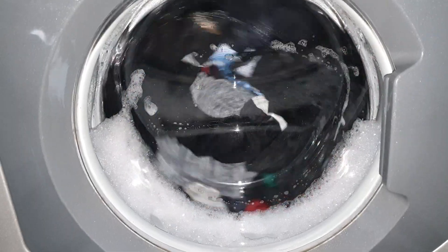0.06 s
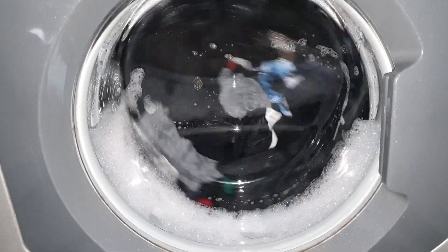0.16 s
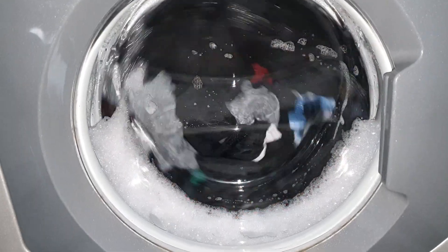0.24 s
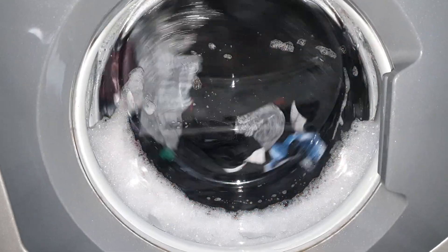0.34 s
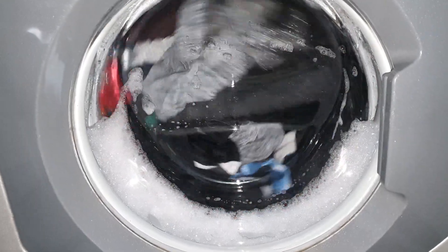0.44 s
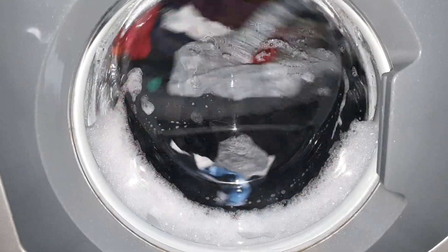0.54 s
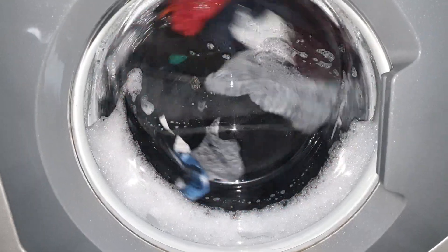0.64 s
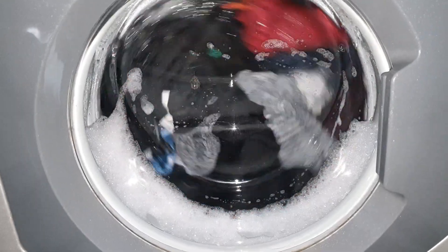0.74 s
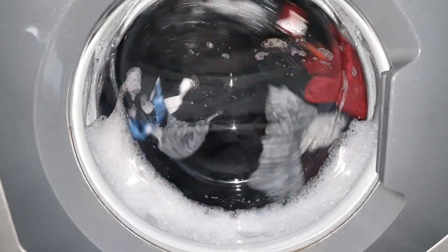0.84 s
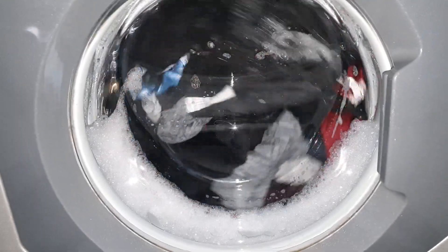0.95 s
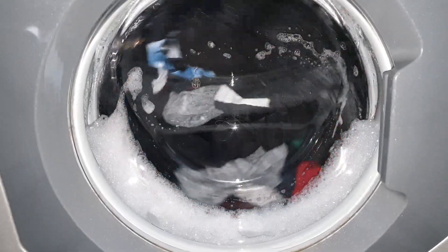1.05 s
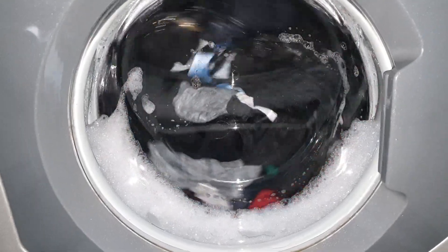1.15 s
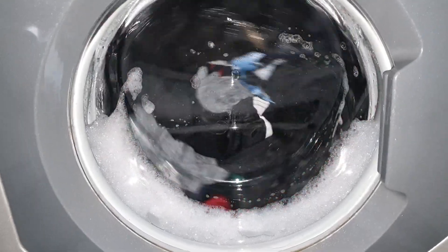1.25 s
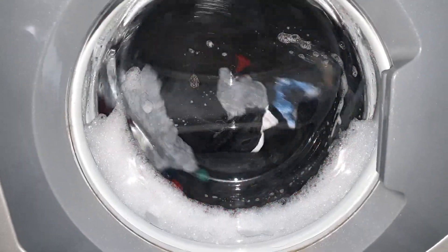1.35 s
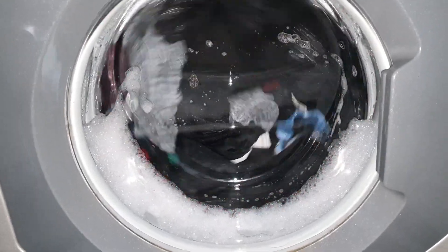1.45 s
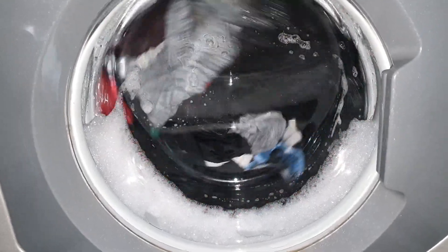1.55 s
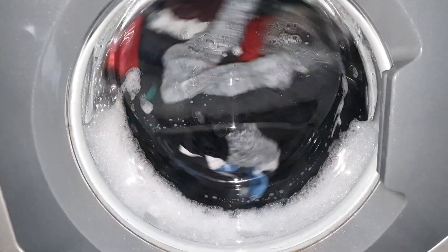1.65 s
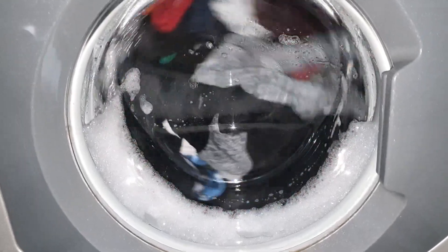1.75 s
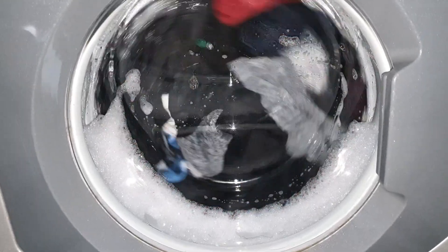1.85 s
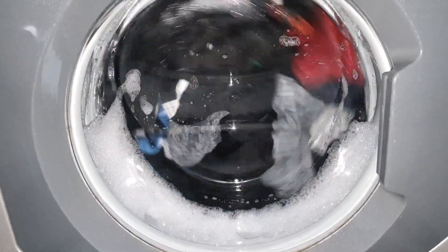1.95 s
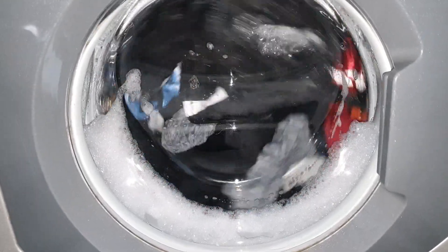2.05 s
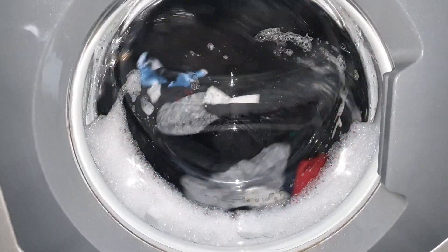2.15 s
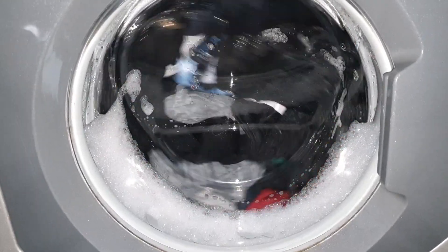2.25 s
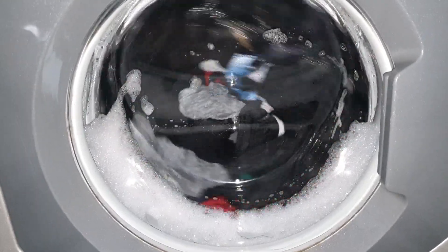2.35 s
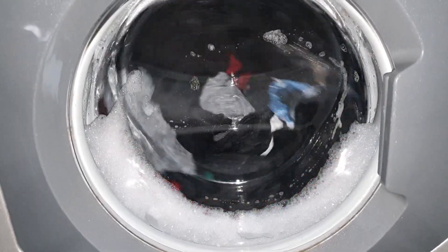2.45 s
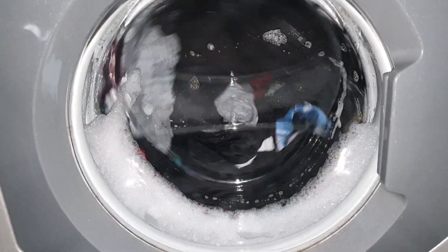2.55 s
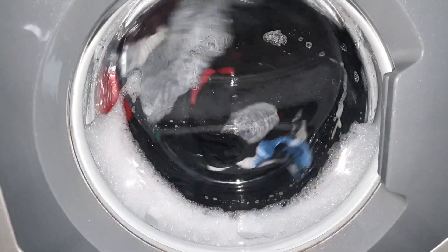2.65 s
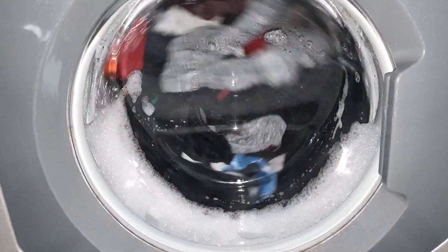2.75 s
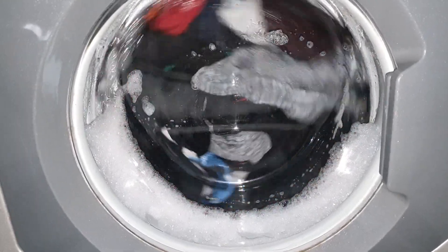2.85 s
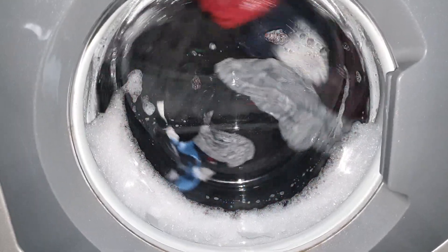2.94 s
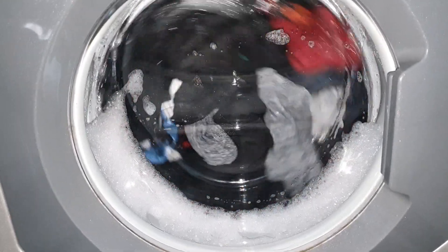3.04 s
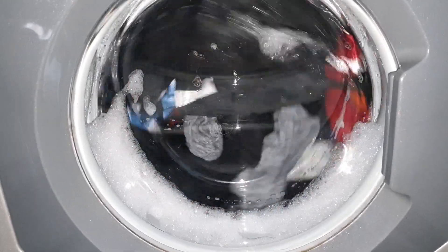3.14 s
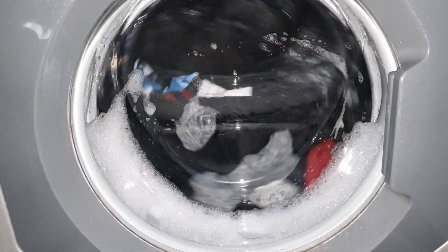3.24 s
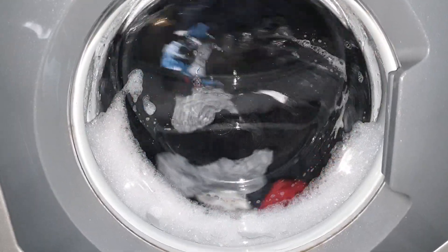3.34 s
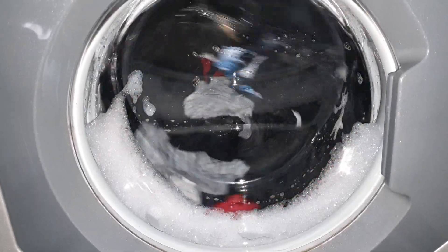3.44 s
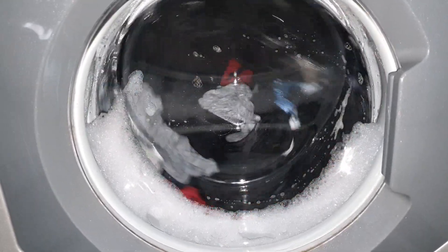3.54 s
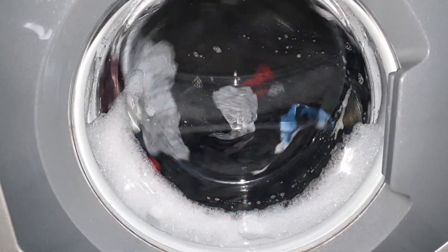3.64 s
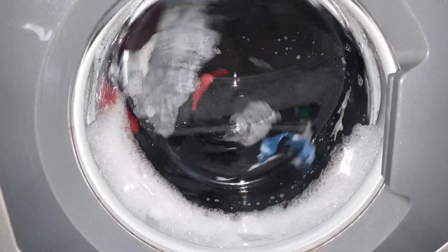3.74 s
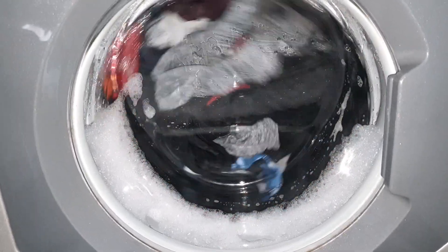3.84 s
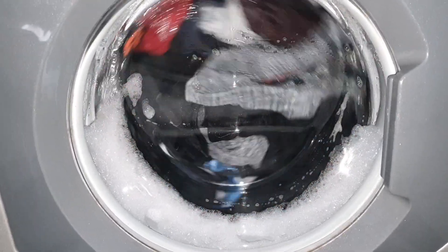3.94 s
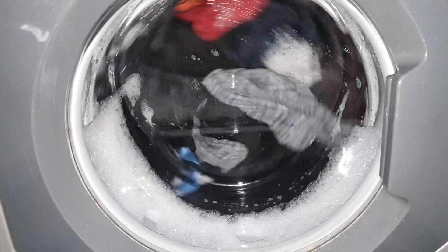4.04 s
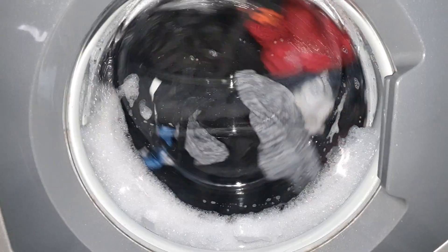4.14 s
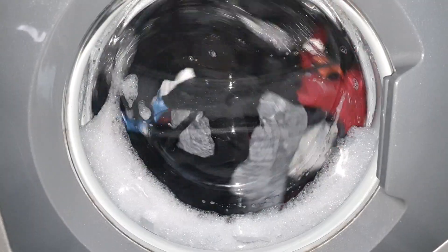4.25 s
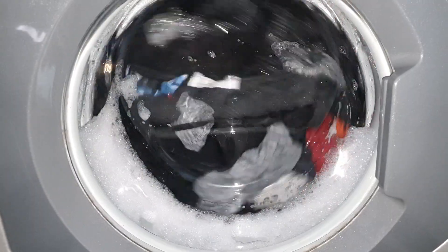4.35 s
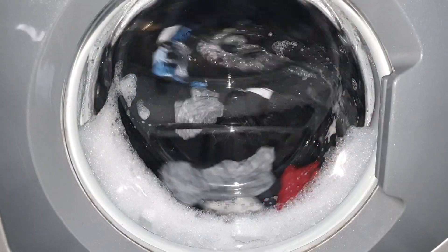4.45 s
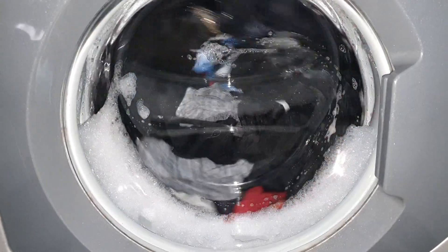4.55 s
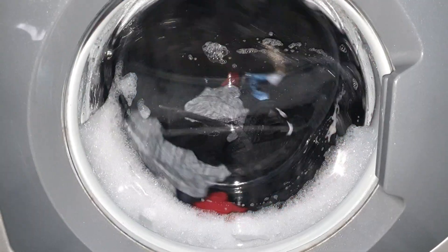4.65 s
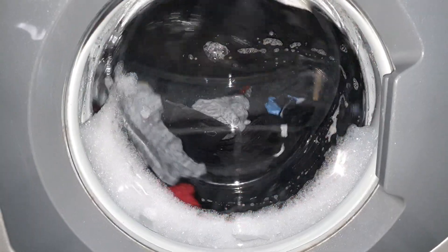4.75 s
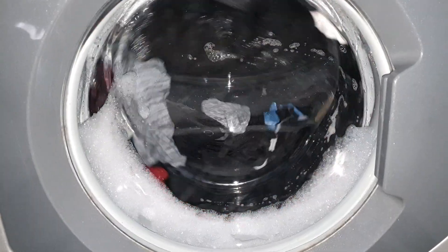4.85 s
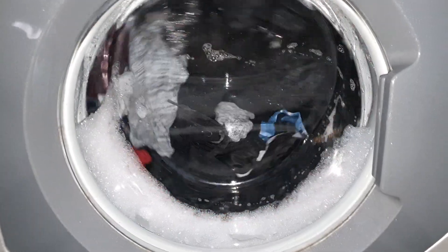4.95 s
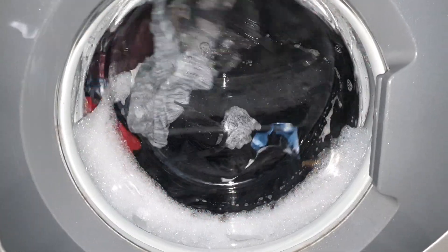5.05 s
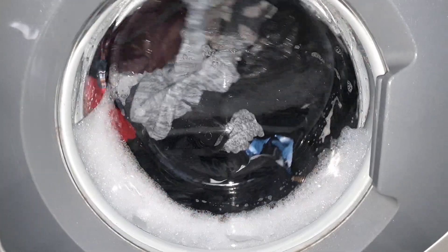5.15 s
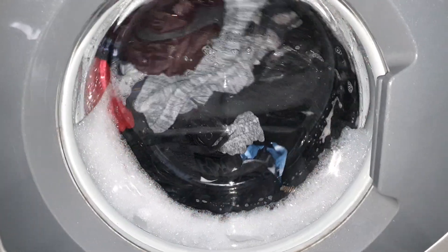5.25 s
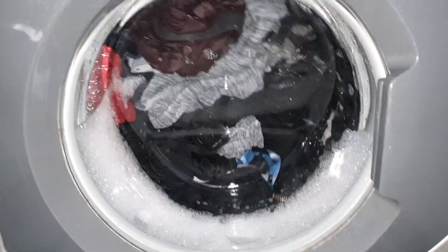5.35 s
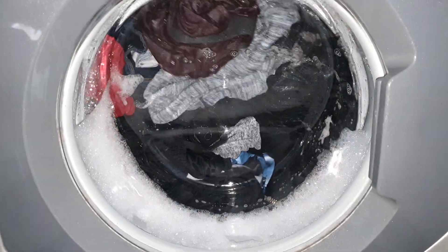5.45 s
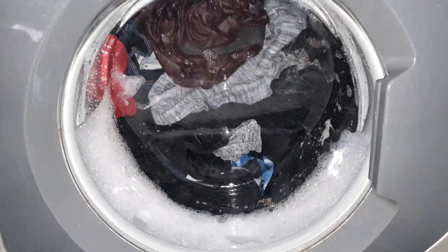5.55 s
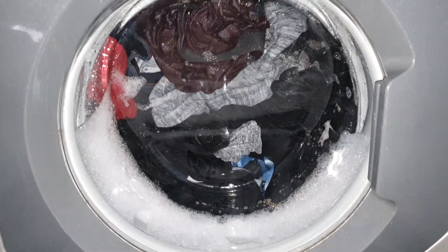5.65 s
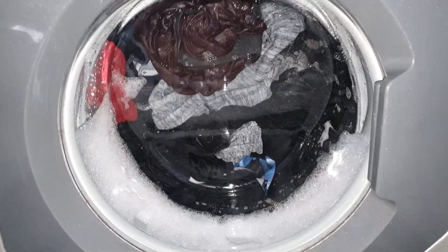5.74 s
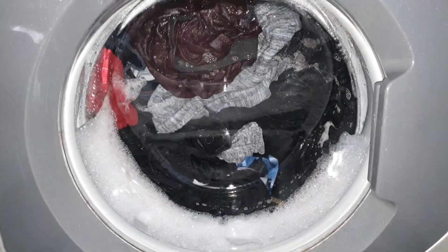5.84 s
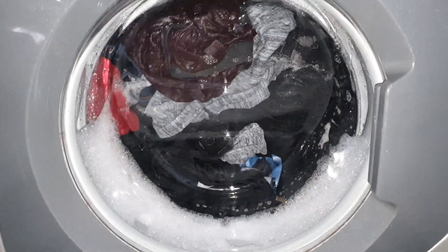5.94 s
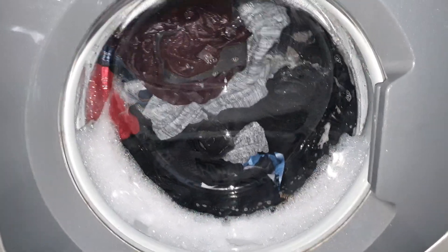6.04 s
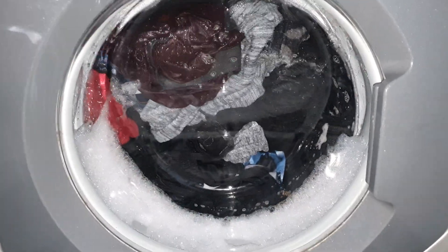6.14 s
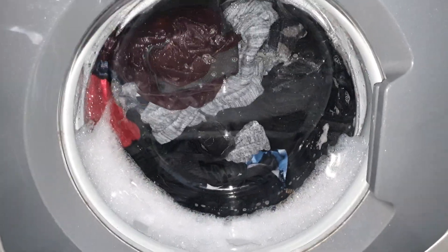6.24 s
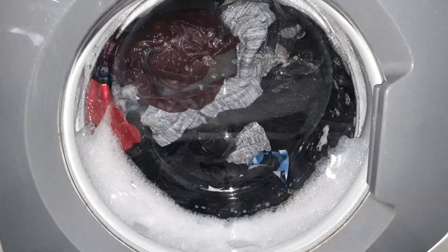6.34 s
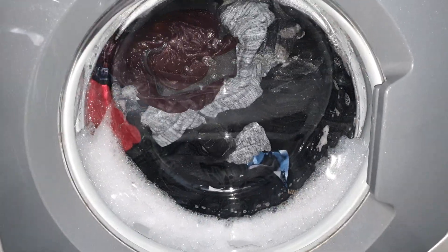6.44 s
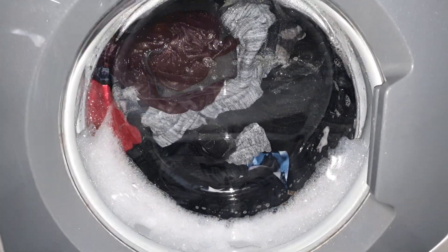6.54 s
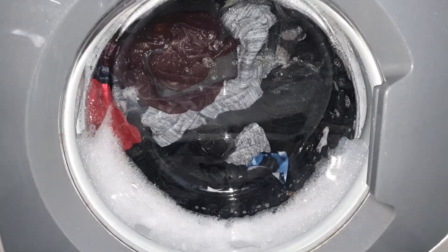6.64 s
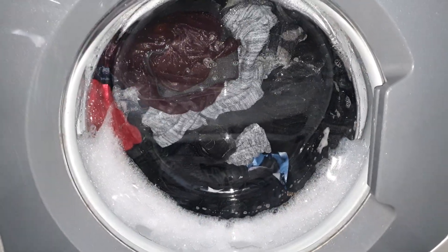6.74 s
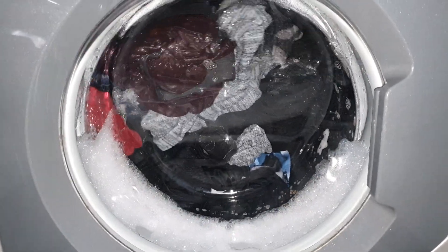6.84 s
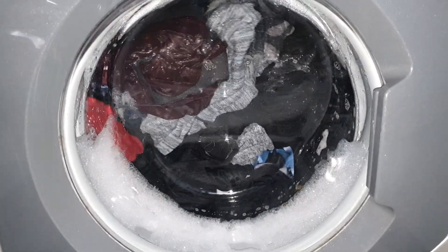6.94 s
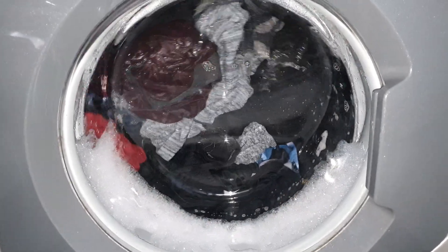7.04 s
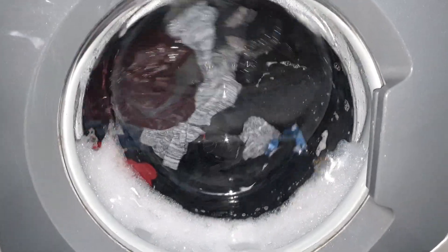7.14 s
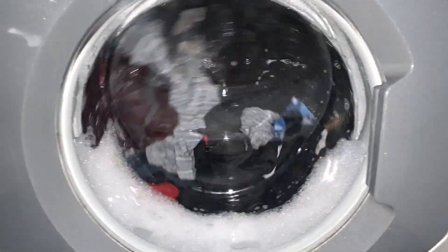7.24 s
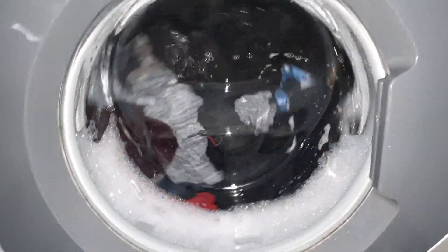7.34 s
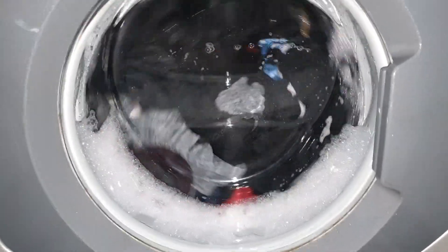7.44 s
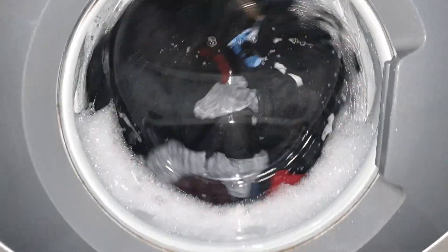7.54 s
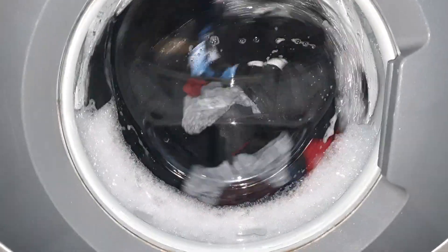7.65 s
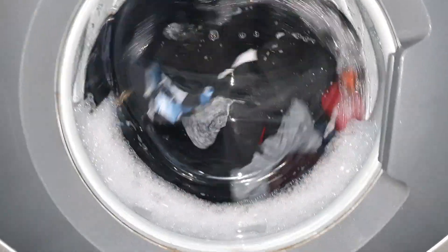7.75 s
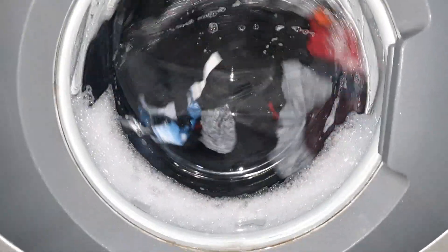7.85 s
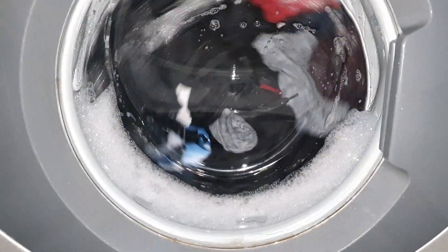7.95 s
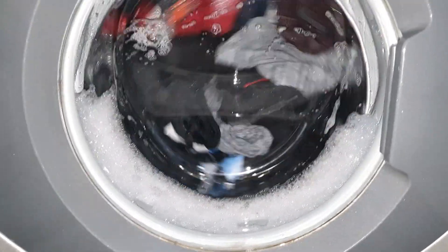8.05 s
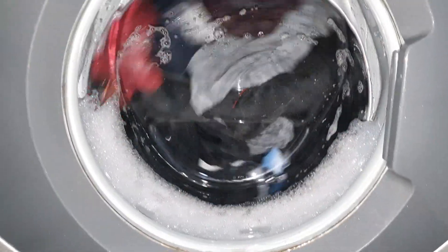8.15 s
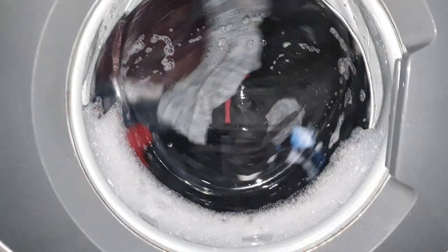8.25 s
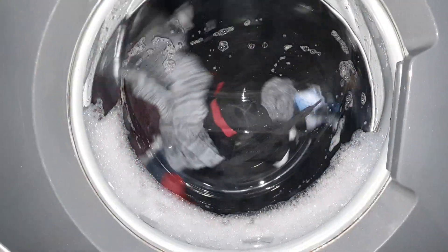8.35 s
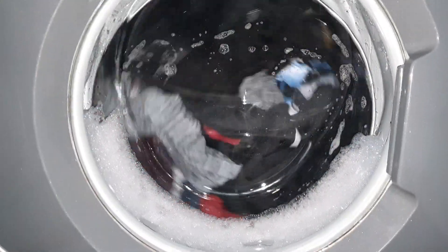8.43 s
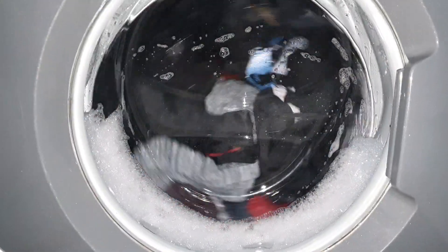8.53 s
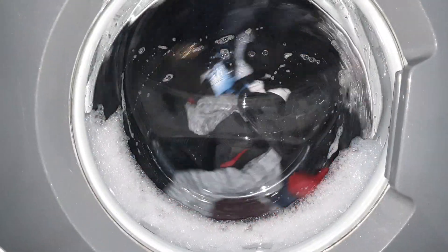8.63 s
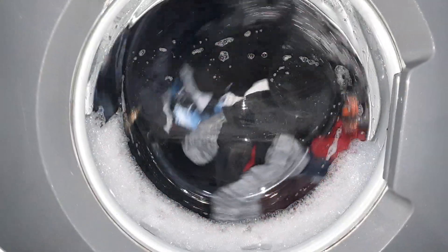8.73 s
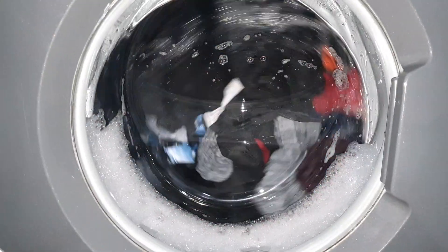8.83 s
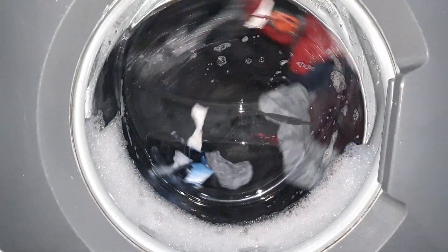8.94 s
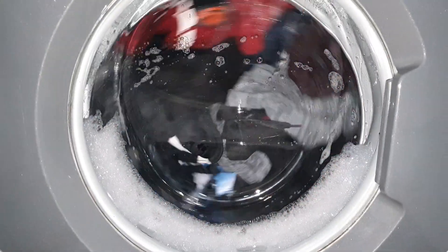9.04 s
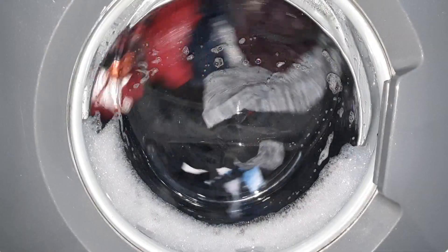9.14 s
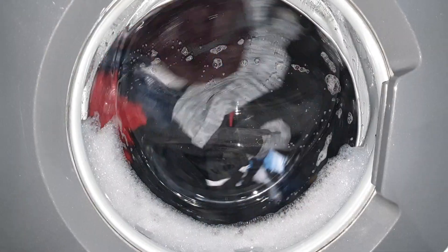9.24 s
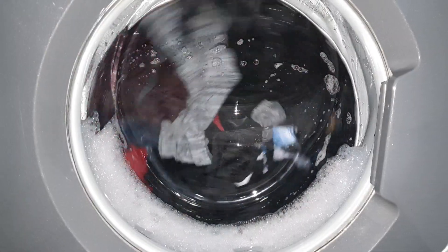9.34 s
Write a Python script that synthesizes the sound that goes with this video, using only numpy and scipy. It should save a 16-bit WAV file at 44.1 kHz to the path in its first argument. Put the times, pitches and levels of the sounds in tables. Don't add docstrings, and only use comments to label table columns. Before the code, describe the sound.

Close at a front-loading washer, wet clothes slap and thud in suds over a motor hum, pause to quiet hum, then tumble again in reverse.

```python
import sys
import numpy as np
from scipy import signal
from scipy.fft import rfft, irfft, next_fast_len
from scipy.io import wavfile
from scipy.ndimage import uniform_filter1d, minimum_filter1d

SR = 44100
rng = np.random.default_rng(int(sys.argv[2]) if len(sys.argv) > 2 else 0)


def to_wav(s):
    ch = np.atleast_2d(s).T
    pcm = np.round(np.clip(ch, -1, 1) * 32767)
    wavfile.write(sys.argv[1], SR, pcm.astype(np.int16))


def invert_db(x):
    u = np.asarray(x, float) / 20
    return 10 ** u


N = 414099

# start_s [s], peak_db [dB], bass_db [dB]
SLAPS = [(0.1239, -41.5, -12), (0.4493, -40.5, -10.5), (0.7696, -46.5, -7), (0.781, -50, -6),
         (1.262, -42.5, -9.5), (1.66, -48.5, -9), (1.8616, -50, -15), (2.151, -39.5, -11),
         (2.481, -39.5, -6.5), (2.9302, -39, -32), (3.287, -38.5, -11), (3.345, -47.5, -21),
         (3.69, -46.5, -13), (4.09, -39, -29), (4.433, -46, -19), (7.581, -37, -13), (7.7743, -40.5, -7),
         (7.957, -40, -6), (8.054, -46.5, -5), (8.288, -51.5, -17), (8.3794, -56, -15), (8.628, -43.5, -4),
         (9.1134, -50, -7)]
# start_s [s], peak_db [dB], treble_db [dB], bass_db [dB]
SPLASHES = [(.301, -63, -6, -12), (7.93, -59.5, -5, -8), (8.603, -53.5, -13, -5), (1.132, -57, -18, 0.5),
            (1.8086, -64, -5, 10.5), (1.9325, -54.5, -15, -1.5), (1.988, -54.5, -15, -2.5),
            (2.2573, -76, -15, 13), (2.9118, -52.5, -21, -1), (4.075, -49, -15, -4), (3.053, -52, -23, 2),
            (3.1032, -55, -8, 2), (3.511, -61, -7, -11), (3.9114, -58, -9, -3), (4.253, -50.5, -16.5, 1.5),
            (4.401, -49.5, -15.5, 0.5), (4.478, -57.5, -8, -18), (4.508, -56.5, -12, -14),
            (4.535, -64, -9, -9), (4.8085, -51.5, -16.5, -13), (4.8693, -57, -15.5, -6),
            (5.0843, -64.5, -8.5, 5.5), (7.274, -52.5, -16, -4), (7.4, -55.5, -17, -22),
            (7.335, -48.5, -15, -5), (8.188, -50.5, -27, -1), (8.905, -70, -30, 5), (8.999, -55.5, -31, 1),
            (9.2582, -57, -24, 6)]
SLAP_TREBLE_DB = -20.5
START_S = 6.7


def curves(table):
    s, *columns = np.transpose(table)
    return [np.interp(np.arange(N) / SR, s, c) for c in columns]


def ramp(start_s, length_s):
    return np.clip((np.arange(N) / SR - start_s) / length_s, 0, 1)


def between(ends, share):
    return ends[0] + (ends[1] - ends[0]) * share


def unit(x):
    return x / np.sqrt(np.mean(x ** 2))


def colour(x, points):
    hz, db = np.transpose(points)
    size = next_fast_len(N)
    bins_hz = np.fft.rfftfreq(size, 1 / SR) + 1
    gain = invert_db(np.interp(np.log(bins_hz), np.log(hz), db))
    return irfft(rfft(x, size) * gain, size)[..., :N]


def band(x, lo_hz, hi_hz, order=2):
    sos = signal.butter(order, [lo_hz, min(hi_hz, SR / 2.1)], "band", fs=SR, output="sos")
    return signal.sosfilt(sos, x)


def ring(x, hz, t60_s):
    pole = np.exp(2j * np.pi * hz / SR - np.log(1000) / (t60_s * SR))
    return signal.lfilter([0, pole.imag], [1, -2 * pole.real, abs(pole) ** 2], x)


def walk(rate_hz):
    step = 32
    k = int(SR / rate_hz / step)
    held = np.repeat(rng.standard_normal(N // step // k + 2), k)
    slow = uniform_filter1d(uniform_filter1d(held, k), k)
    return 1.88 * np.interp(np.arange(N) / step, np.arange(len(slow)), slow)


def pair(alike):
    mid, side = rng.standard_normal((2, N))
    return np.sqrt((1 + alike) / 2) * mid + np.sqrt((1 - alike) / 2) * side * np.array([[1], [-1]])


def add(out, start_s, sound):
    i = int(start_s * SR)
    out[..., i:i + sound.shape[-1]] += sound[..., :N - i]


def sides(pan_db):
    return invert_db(np.array([[pan_db / 2], [-pan_db / 2]]))


def water(churn_db, slosh_db):
    # freq_hz [Hz], level_db [dB per Hz]
    splash_shape = [(410, -16), (700, 0.5), (898, 3), (1200, -3), (1580, -9.5), (1890, -5.5), (2080, -5),
                    (2990, -4), (4610, -17), (6830, -18.5), (7690, -38), (9350, -20.5), (13900, -50),
                    (15200, -27), (16000, -47)]
    # freq_hz [Hz], level_db [dB per Hz]
    churn_shape = [(76, -36), (130, -15.5), (146, 6), (205, -8), (292, -0.5), (425, -12), (668, -11),
                   (767, -15), (1070, -12), (1500, -23), (2510, -23.5), (3500, -27.5), (5520, -27),
                   (7560, -35.5), (14500, -46.5)]
    # freq_hz [Hz], left_minus_right_db [dB]
    balance = [(60, 2), (110, -1), (200, 0.5), (380, 2.5), (700, 1.5), (1290, 17), (2380, 21), (4400, 20),
               (8120, 6), (15000, 3.5)]
    pan_at_slap_db, pan_per_treble_db = 9, -2
    onset_s_per_db, hardest_db = .0004, -36
    spray_rise_s, slap_patch_db, suds_patch_db = .005, .6, .8

    flop, body, spray = np.zeros((3, 2, N))
    t = np.arange(SR // 2) / SR
    for s, db, treble_db, bass_db in [(s, db, SLAP_TREBLE_DB, bass) for s, db, bass in SLAPS] + SPLASHES:
        pan_db = pan_at_slap_db + pan_per_treble_db * (treble_db - SLAP_TREBLE_DB)
        fall = 1.25 * invert_db(-60 * t / 0.43) + 0.5 * np.exp(-(t / 0.038) ** 2) + 0.48 * np.exp(-t / 0.0075)
        fall = fall * np.clip(t / (onset_s_per_db * max(hardest_db - db, 1)), 0, 1)
        mist = fall ** 1.6 * (1 - np.exp(-t / spray_rise_s))
        add(flop, s, invert_db(db + bass_db - 1.5) * fall)
        add(body, s, invert_db(db - 5.5) * sides(0.34 * pan_db - 14.5) * fall)
        add(spray, s, invert_db(db + treble_db + 19.5) * sides(0.13 * pan_db - 7.5) * mist)

    grains = invert_db(1.7 * uniform_filter1d(rng.exponential(size=N), size=14))
    slap = unit(colour(pair(0.21) * grains, splash_shape))
    churn = unit(band(colour(pair(0.8) * np.sqrt(grains), churn_shape), 73, 20000))
    slosh = unit(colour(band(pair(1.0), 137, 603), churn_shape))
    out = invert_db(slosh_db + 1.17 * walk(9)) * slosh
    edges_hz = 620 * 2 ** np.arange(0, 5.1, .5)
    for lo, hi in zip(edges_hz, edges_hz[1:]):
        envelope = flop if hi < 1500 else body if hi < 7100 else spray
        keep = np.exp(-lo ** 2 / (4000 * SR))
        burst = signal.lfilter([1 - keep], [1, -keep], envelope)
        out = out + band(slap, lo, hi) * burst * invert_db(slap_patch_db * walk(70))
        out = out + band(churn, lo, hi) * invert_db(churn_db + 11.5 + suds_patch_db * walk(17))
    return np.array([colour(ear, [(hz, sign * db / 2) for hz, db in balance])
                     for ear, sign in zip(out, (1, -1))])


def droplets():
    # freq_hz [Hz], level_db [dB], t60_s [s]
    clack_modes = [(3050, -2, 0.022), (2240, -10, 0.021), (2570, -9, 0.03), (3520, -7, 0.012)]
    clack_db, clack_s = -11.5, 0.0055
    drop_db, drop_spread_s, drop_hz, drop_cycles = -19, .055, 2600, 5

    blow, out = np.zeros((2, 2, N))
    t = np.arange(SR // 60) / SR
    for s, db, *_ in SLAPS + SPLASHES:
        hard = db > -47
        add(blow, s, invert_db(db) * rng.standard_normal((2, len(t))) * np.exp(-t / clack_s) * hard)
        for late, size, pitch, pan in zip(*rng.exponential(size=(2, 9)), *rng.standard_normal((2, 9))):
            hz = drop_hz * np.exp(.35 * pitch)
            bubble = np.sin(2 * np.pi * hz * t * (1 + .004 * hz * t)) * np.exp(-t * hz / drop_cycles * 2)
            gain = invert_db(db + drop_db + 2.0 * size) * sides(6 + 4 * pan)
            add(out, s + 0.0071 + drop_spread_s * min(late, 2.2), gain * bubble)
    clack = sum(invert_db(db) * ring(blow, hz, t60) for hz, db, t60 in clack_modes)
    return out + invert_db(clack_db - 16.0) * sides(14.4) * clack


def thuds():
    # start_s [s], peak_db [dB], boom_db [dB]
    drops = [(0.141, -43, -40), (0.453, -41.5, -47), (0.872, -65, -31), (1.15, -65, -38),
             (1.845, -40.5, -44), (1.877, -40, -46), (1.999, -50, -35), (2.178, -41, -35),
             (2.514, -35.5, -40), (2.551, -42, -34.5), (2.95, -33, -40), (2.985, -34, -51),
             (3.034, -41, -28), (3.111, -44, -47), (3.308, -34, -40), (3.348, -41, -41),
             (3.698, -53, -41.5), (4.109, -33.5, -47), (4.135, -31.5, -35), (4.148, -38, -34),
             (4.278, -39, -43), (4.437, -40, -53), (4.844, -41.5, -36.5), (4.88, -42.5, -57),
             (7.583, -47, -56), (7.805, -40, -34.5), (7.85, -45, -45), (7.976, -39, -28.5),
             (8.124, -61, -29.5), (8.171, -45.5, -49), (8.639, -38, -52), (8.678, -38.5, -36),
             (8.96, -48, -33)]
    # freq_hz [Hz], level_db [dB], t60_s [s]
    shell_modes = [(244, -8, 0.084), (259.8, 0, 0.54), (282.3, 9, 0.39), (310, -3, 0.15), (335, 0, 0.18)]
    push_s = 0.04866
    shell_damp = .55

    out = np.zeros((2, N))
    n = int(push_s * SR)
    for s, db, boom_db in drops:
        push = rng.standard_normal((3, SR // 3))
        push *= np.pad(np.hanning(n), (0, SR // 3 - n))
        detune = 1 + 0.033 * push[0].sum() / np.sqrt(n)
        drive = push[0] + 0.36 * push[1:]
        shell = sum(invert_db(g_db) * ring(drive, hz * detune, shell_damp * t60) for hz, g_db, t60 in shell_modes)
        shell = band(shell + 8.0 * push[1:], 214, 447)
        tub = ring(push[1], 87.7, 0.5) + ring(push[1], 105.0, 0.088) + 1.13 * ring(push[1], 102.97, 0.76)
        tub = band(tub, 72, 149.5, order=3)
        thud = invert_db(db + 2.0) * shell / abs(shell).max() + invert_db(boom_db - 4.0) * tub / abs(tub).max()
        add(out, s - 0.306 * push_s, thud)
    return out


def ticks():
    # start_s [s], peak_db [dB], treble_db [dB],
    # ring_hz [Hz]
    contacts = [(0.1859, -38.5, -32, 3330), (0.2461, -49, -8.5, 3380), (0.8897, -38.5, -29, 3350),
                (0.9307, -46.5, -25, 3450), (.662, -60, -14, 5500), (.69, -61, -17, 5500),
                (1.0016, -56, -20, 2370), (1.108, -49, -19, 2300), (1.1342, -45, -28, 1760),
                (1.386, -50.5, -18.5, 3300), (1.455, -56, -10.5, 2700), (1.9933, -43.5, -20, 1860),
                (2.073, -42.5, -20.5, 1780), (2.2563, -45.5, -27, 1800), (2.376, -54, -17, 2470),
                (2.497, -52, -9.5, 3380), (2.6302, -52.5, -13, 2620), (3.02, -57, -18, 6100),
                (3.057, -43, -31, 2520), (3.23, -64, -11, 2450), (3.346, -51, -22, 4700),
                (3.366, -61, -20, 4730), (3.4704, -61, -20, 4330), (3.606, -50, -6, 3380),
                (3.747, -50, -28, 2450), (4.0235, -59, -18, 4400), (4.306, -51, -18, 2450),
                (4.454, -46.5, -22, 4060), (4.4785, -51, -14, 4640), (4.512, -56, -19, 4560),
                (4.53, -52, -26, 2520), (4.73, -51.5, -11, 1840), (6.986, -65, -23, 2820),
                (7.8138, -36, -30, 1820), (7.997, -45, -11, 3330), (8.0598, -47, -29, 2670),
                (8.7284, -50.5, 2, 4200), (8.811, -42.5, -17.5, 1810), (9.0906, -48, -36, 2330),
                (9.1152, -56, -26, 3000), (9.336, -46, -36, 2920)]
    glass_hits_s = [.185, .246, .89, 1.386, 2.073, 2.498, 3.021, 3.606, 4.73, 7.997, 8.728, 8.81]
    # freq_hz [Hz], level_db [dB], t60_s [s]
    glass = [(1780, -14, 0.3), (3290, -8, 0.078), (4400, -7.5, 0.043), (6190, -1, 0.027)]
    scatter_db, detune, hard_hz, pan_db = 1.5, .02, 15000, 7

    out = np.zeros((2, N))
    t = np.arange(SR // 9) / SR
    for s, db, treble_db, hz in contacts:
        noise = rng.standard_normal((2, len(t)))
        square = min(abs(s - np.array(glass_hits_s))) < .005
        glass_db = (0 if square else -15) + 0.42 * (min(treble_db, -12) + 22)
        note = np.sin(2 * np.pi * hz * t) * invert_db(-60 * t / 0.042)
        for (f, g_db, t60), luck in zip(glass, rng.standard_normal(len(glass))):
            fall = invert_db(g_db + glass_db + scatter_db * luck - 60 * t / t60)
            note = note + fall * np.sin(2 * np.pi * f * (1 + detune * luck) * t)
        note = note + band(noise, 0.32 * hz, 1.38 * hz) * invert_db(-60 * t / 0.16)
        crack = band(noise, 3000, np.clip(17496 + 260 * treble_db, 9000, 16500))
        crack = crack * (invert_db(-60 * t / 0.027) + 0.16 * invert_db(-60 * t / 0.38))
        add(out, s, invert_db(db - 5.0) * sides(pan_db) * (note + invert_db(treble_db + 13.0) * crack))
        edge = band(noise, hard_hz - 900, hard_hz + 900) * invert_db(-60 * t / 0.047)
        add(out, s, invert_db(db + 2 * min(treble_db, -6) + 24) * edge)
    return out


def knocks():
    # start_s [s], upper_panels_db [dB], lower_panel_db [dB]
    blows = [(.785, -54, -39.5), (1.139, -60, -52), (3.187, -71, -41), (4.2, -63, -48), (4.29, -55, -58),
             (4.403, -53, -40), (4.456, -38.5, -33), (6.465, -73, -66), (6.703, -44, -43.5),
             (7.012, -37.5, -58), (8.191, -61, -36), (9.262, -50, -48)]
    # freq_hz [Hz], level_db [dB], t60_s [s]
    upper_modes = [(350, -11, .15), (545, -6, .1), (657, -2, .27), (689, 0, .27), (985, -19, .1),
                   (1206, -13, .06), (1717, -13, .13), (1906, -23, .1)]

    sharp, dull = np.zeros((2, N))
    rattle = np.zeros((2, N))
    t = np.arange(SR // 8) / SR
    for s, db, dull_db in blows:
        add(sharp, s - .002, invert_db(db) * np.ones(1))
        add(dull, s - .002, invert_db(dull_db) * np.ones(1))
        swell = invert_db(-60 * t / 0.26) * (1 - np.exp(-t / 0.0032))
        add(rattle, s, invert_db(max(db, dull_db)) * rng.standard_normal((2, len(t))) * swell)
    upper = sum((-1) ** k * invert_db(db) * band(ring(sharp, hz, t60), 0.18 * hz, 1.6 * hz, order=1)
                for k, (hz, db, t60) in enumerate(upper_modes))
    lower = band(ring(dull, 577, 0.16) + 0.5 * ring(dull, 481.5, 0.15), 490, 590, order=1)
    return upper + lower + invert_db(7.5) * band(rattle, 350, 800) + invert_db(-30) * band(rattle, 950, 1700)


def motor(shake_db, inverter_db, rumble_db, churn_db):
    # freq_hz [Hz], level_db [dB], t60_s [s]
    panel_modes = [(491, 1.5, 0.064), (575, 1, 0.11), (663.4, 2.5, 0.14), (685.6, -10, 0.41),
                   (836, -9.5, 0.17), (1217, -13, 0.17), (1580, -31, 0.13)]
    # freq_hz [Hz], width_hz [Hz], level_db [dB]
    drum_bands = [(1175, 24, 1.5), (1736, 31, 1.5), (2000, 13, -11.5), (2150, 20, -21), (2450, 54, 4.5),
                  (2840, 130, -1.5), (4370, 68, -2), (4780, 64, -3.5), (5420, 78, -14), (6570, 93, -5.5),
                  (9490, 570, -4)]
    whine_hz, flutter_db = 15732, 1.8
    lag_db, settle_start_s, settle_s = -7, 6.97, 0.84

    panels = unit(sum(invert_db(db) * ring(pair(1.0), hz, t60) for hz, db, t60 in panel_modes))
    bands = sum(invert_db(db + flutter_db * walk(20)) * unit(ring(pair(0.067), hz, 2.0 / width))
                for hz, width, db in drum_bands)
    hiss = unit(band(pair(0.27), 14700, 15800, order=4))
    tone = np.sin(2 * np.pi * whine_hz * np.arange(N) / SR + .3 * walk(34))
    inverter = hiss + invert_db(-2.5) * tone
    rumble = unit(band(pair(1.0), 63.8, 110.3, order=3))
    load_db = minimum_filter1d(churn_db, size=SR // 5)
    load_db = load_db + lag_db * ramp(START_S, .1) * (1 - ramp(settle_start_s, settle_s))
    out = invert_db(shake_db + 4.5) * panels + invert_db(load_db - 10.0) * bands
    return out + invert_db(inverter_db + 1.5) * inverter + invert_db(rumble_db + 0.5) * rumble


def whine():
    # start_s [s], pitch_hz [Hz], peak_db [dB]
    sing = [
        (7.4, 652, -82),
        (7.7, 668, -61),
        (7.92, 692, -60),
        (8.15, 720, -64),
        (8.36, 738, -68),
        (8.5, 686, -57),
        (8.82, 692, -54),
        (9.08, 681, -57.5),
        (9.27, 664, -59),
        (9.39, 684, -54),
    ]
    hz, db = curves(sing)
    phase = 2 * np.pi * np.cumsum(hz + 1.16 * walk(4)) / SR
    return invert_db(db + 1.4 * walk(14)) * np.sin(phase + .3 * walk(25))


def pump():
    # freq_hz [Hz], level_db [dB]
    lines = [(139, -67), (156.1, -60), (186, -69), (312.2, -68.5), (339, -84.5), (511, -75.5),
             (936.7, -80.5), (986.4, -71.5), (3898, -96)]
    hum_hz, hum_db, rotor_hz, rotor_db = 99.86, -44.5, 98.64, -53
    beat_peak_s, waver_db = 5.75, .9

    t = np.arange(N) / SR - beat_peak_s
    hum = invert_db(hum_db) * np.sin(2 * np.pi * hum_hz * t) + invert_db(rotor_db) * np.sin(2 * np.pi * rotor_hz * t)
    valve = invert_db(-92) * unit(ring(rng.standard_normal(N), 3880, 0.002))
    tones = sum(invert_db(db + 3.0 + waver_db * walk(9)) * np.sin(2 * np.pi * hz * t + 0.46 * walk(5))
                for hz, db in lines)
    return hum + valve + tones


def squirt():
    # freq_hz [Hz], width_hz [Hz], level_db [dB]
    seal = [(3380, 260, -9), (3520, 170, -5), (1390, 940, -6.5), (6800, 640, -14), (9400, 970, -13),
            (11300, 900, -10), (12500, 900, -14), (4830, 1000, -13)]
    peak_s, build_s, stop_s, leak_s, level_db = 5.411, 0.11, .003, .03, -58

    air = sum(invert_db(db + 1.3 * walk(130)) * unit(ring(pair(0.17), hz, 2.7 / width)) for hz, width, db in seal)
    after = np.clip(np.arange(N) / SR - peak_s, 0, 1)
    stop = 0.75 * np.exp(-after / stop_s) + .15 * np.exp(-after / leak_s)
    return invert_db(level_db) * ramp(peak_s - build_s, build_s) ** 1.26 * stop * sides(-9.5) * air


def relay():
    click_s, width_s, level_db = 6.631, .00033, -43
    u = np.clip((np.arange(N) / SR - click_s) / width_s, -9, 9)
    return invert_db(level_db) * (1 - u ** 2) * np.exp(-u ** 2 / 2)


def room():
    # freq_hz [Hz], level_db [dB per Hz]
    floor_shape = [(12, -47), (20, -20), (48, -6.5), (74, -15.5), (104, -14), (216, -15), (319, -19.5),
                   (434, -27), (513, -21), (780, -44.5), (976, -25.5), (1400, -44.5), (3840, -49),
                   (5530, -58), (16000, -58)]
    level_db, drift_db = -58.5, .5
    low = band(pair(1.0), 36, 800, order=3)
    high = band(pair(0.16), 650, 22000, order=1)
    draught = invert_db(-74) * unit(band(pair(0.1), 36, 60))
    return invert_db(level_db + drift_db * walk(7.3)) * unit(colour(low + high, floor_shape)) + draught


def scene():
    # start_s [s], level_db [dB]
    stir = [(0.0, -65), (.42, -67.5), (1.72, -66.5), (2.04, -64.5), (2.93, -67), (3.16, -63.5), (3.84, -69),
            (4.36, -66), (4.94, -71.5), (5.18, -80), (6.01, -95), (7.0, -84.5), (7.26, -75.5), (7.3, -64.5),
            (7.77, -62), (8.4, -66), (8.58, -68), (8.79, -63.5), (9.39, -68.5)]
    cut_s, cut_fade_s, coast_s = 4.38, 0.14, 1
    start_ramp_s, spin_up_s = 0.45, 0.36
    shake_db, inverter_db, rumble_db = (-89.5, -63), (-100, -82.5), (-60.5, -55)

    power = 1 - ramp(cut_s, cut_fade_s) + ramp(START_S, start_ramp_s)
    speed = 1 - ramp(cut_s, coast_s) + ramp(START_S, spin_up_s)
    churn_db, = curves(stir)
    slosh_db = -54.5 + .5 * (churn_db + 66)
    drive = motor(between(shake_db, speed) + 0.4 * walk(3.6), between(inverter_db, power),
                  between(rumble_db, speed) + 1.2 * walk(12), churn_db)
    cabinet = whine() + relay() + pump() * sides(-0.61) + knocks() * sides(0.96) + thuds() * sides(0.51)
    return cabinet + drive + water(churn_db, slosh_db) + droplets() + ticks() + squirt() + room()


def low_pass(x):
    return signal.sosfilt(signal.butter(12, 16470, fs=SR, output="sos"), x)


def record(dry):
    left_lag_samples, top_hz = 10, 15830
    late = np.array([np.roll(dry[0], left_lag_samples), dry[1]])
    rounded = np.tanh(late * 11.) / 11.
    mix = colour(rounded, [(20, 0), (top_hz, 0), (top_hz + 40, -26), (22050, -40)])
    return low_pass(mix)


dry = scene()
out = record(dry)
to_wav(out)
```